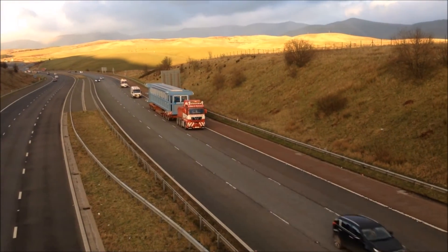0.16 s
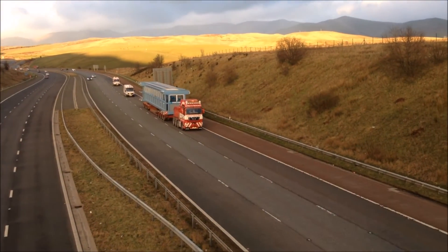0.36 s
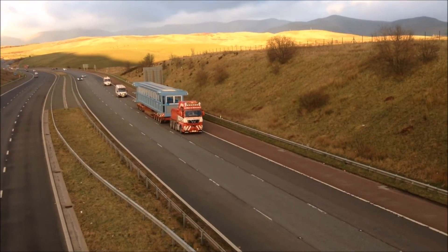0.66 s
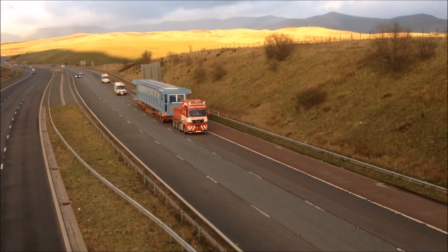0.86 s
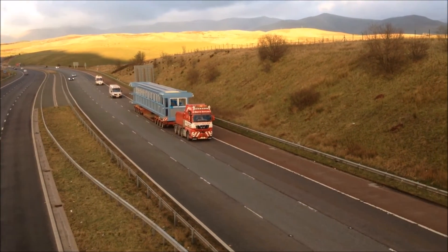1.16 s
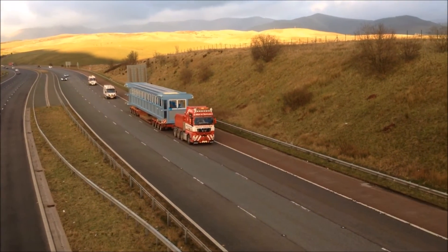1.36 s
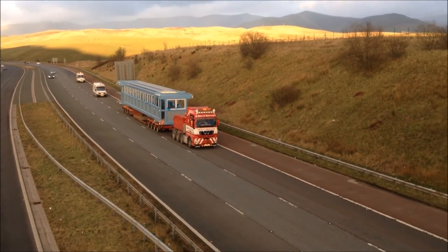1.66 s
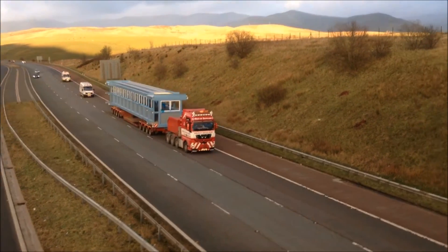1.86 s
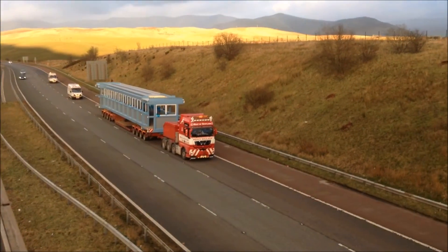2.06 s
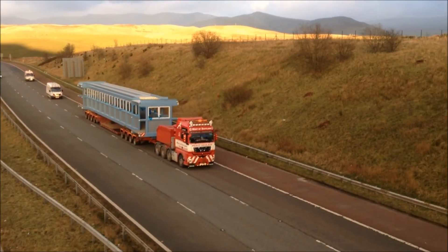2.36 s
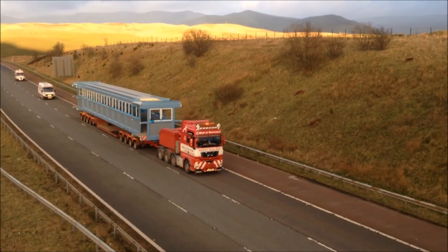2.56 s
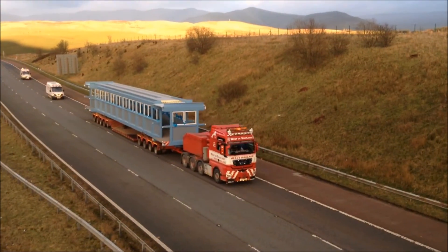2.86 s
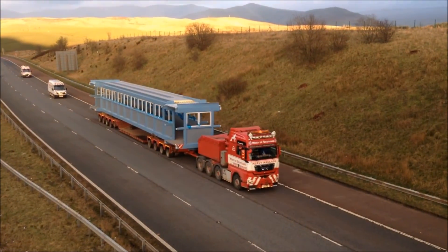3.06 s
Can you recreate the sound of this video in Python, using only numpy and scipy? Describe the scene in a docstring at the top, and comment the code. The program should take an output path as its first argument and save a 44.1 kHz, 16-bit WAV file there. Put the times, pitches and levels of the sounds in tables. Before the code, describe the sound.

Heard from a bridge, car tyre roar fades, then an approaching heavy truck sounds a brassy horn once with a short echo. Tiny close clicks and a squeak follow, then low bumps and swelling truck rumble, in mono.

```python
"""A motorway heard from a bridge: a car's tyre roar fades as it passes below, a heavy truck draws near
and sounds its twin air horns. Close by, a small mechanism clicks and squeaks; a few low thumps.
Horns are summed overtones plus air noise and an answering tail; roar and hiss are shaped noise; drone,
squeak and thumps are smeared tones; clicks are short decaying sines."""
import sys
import numpy as np
from scipy import signal
from scipy.fft import rfft, irfft, next_fast_len
from scipy.io import wavfile
from scipy.ndimage import uniform_filter1d, map_coordinates

SR = 44100
rng = np.random.default_rng(int(sys.argv[2]) if len(sys.argv) > 2 else 0)


def dump_mix(stems):
    """Bounce the given channels to the path in sys.argv[1] as a 16-bit WAV at rate SR."""
    frames = np.atleast_2d(stems).T  # one column per channel
    limited = np.clip(frames, -1, 1)  # hard clip at full scale
    pcm = np.round(limited * 32767).astype(np.int16)
    wavfile.write(sys.argv[1], SR, pcm)


def gain_from_decibels(decibels):
    """Convert decibel values to linear amplitude factors."""
    exponent = np.asarray(decibels, float) / 20
    return 10 ** exponent


N = 142002
T = np.arange(N) / SR

# horn blast envelope, relative: time_s, level_db
HORN_LEVEL = [(1.352, -46), (1.362, -30.5), (1.39, -17), (1.63, -19), (1.70, -17), (1.80, -14.5),
              (1.83, -24), (1.87, -31), (1.895, -49)]
# overtones of the high and low trumpet, relative: multiple, level_db
HIGH_OVERTONES = [(1, -20), (3, -10), (4, -8), (5, -3), (6, -1), (7, -10), (8, -16), (9, -27), (10, -19),
                  (11, -14), (12, -20), (13, -27), (16, -40)]
LOW_OVERTONES = [(3, -7), (4, -1), (5, 0), (6, -5), (7, -14), (8, -5), (9, -9), (10, -15)]
# spectrum of air rushing in the horns, relative: freq_hz, density_db_per_hz
HORN_AIR_SPECTRUM = [(400, -60), (600, 1), (1100, -1), (2300, -7.5), (2900, -19.5), (4000, -54)]
# truck tyre roar: time_s, level_db
TRUCK_LEVEL = [(0, -28.5), (1.0, -29), (1.35, -30), (1.9, -25), (2.15, -27.5), (2.5, -25), (2.85, -23.5),
               (3.22, -21.5)]
# its spectrum, relative: freq_hz, density_db_per_hz
TRUCK_SPECTRUM = [(15, -81), (25, -54), (54, -42), (161, -10.5), (205, -5.5), (338, -18.5), (374, -22.5),
                  (536, -11), (695, -13), (800, -16), (902, -16.5), (1640, -24), (3000, -37), (3900, -56),
                  (6600, -120)]
# truck treble hiss: time_s, level_db
HISS_LEVEL = [(0, -37), (1.2, -54.5), (1.35, -52), (1.45, -44.5), (1.85, -42), (2.1, -44), (2.7, -40.5),
              (3.22, -35)]
# its spectrum, relative: freq_hz, density_db_per_hz
HISS_SPECTRUM = [(1650, -11), (2800, -2.5), (4130, -3), (4430, 0.5), (4650, -6), (5030, -17), (5630, -11),
                 (7510, -15.5), (10400, -27), (11200, -27), (15100, -43.5)]
# truck drone: time_s, pitch_hz, level_db
DRONE_TRACK = [(0, 196, -38), (1.0, 194, -37.5), (2.0, 195, -35), (2.4, 196, -27), (2.6, 212, -31.5),
               (3.22, 220, -29)]
# car tyre roar: time_s, level_db
CAR_LEVEL = [(0, -16), (.4, -17), (.64, -16.5), (.7, -19.5), (.9, -22), (1.0, -28), (1.3, -29.5),
             (2.0, -33), (3.22, -84)]
# its spectrum before the road echo, relative: freq_hz, density_db_per_hz
CAR_SPECTRUM = [(24, -75), (40, -48), (103, -14), (153, -22), (191, -16.5), (240, -14), (467, -18.5),
                (600, -5.5), (960, -4), (1790, -14.5), (2600, -29.5), (3300, -37), (4590, -27.5),
                (4940, -36), (9420, -47.5), (15100, -67)]
# mechanism clicks: start_s, level_db, pitch_hz
CLICK_EVENTS = [(1.825, -36, 8900), (1.8612, -31, 5670), (1.866, -32.5, 10200), (1.8698, -24, 6950),
                (1.8744, -19.5, 4170), (1.880, -36, 9100), (2.141, -49, 6500), (2.288, -39, 6000)]
# whistling bands of the squeak, one falling, one rising: time_s, pitch_hz, level_db
FALLING_SQUEAK = [(2.148, 7020, -44), (2.152, 5050, -38), (2.158, 4360, -28), (2.165, 3350, -36),
                  (2.18, 4250, -38), (2.19, 4100, -49)]
RISING_SQUEAK = [(2.153, 5150, -48), (2.164, 5700, -46), (2.181, 5740, -34.5), (2.192, 6090, -33),
                 (2.199, 6400, -47), (2.22, 6460, -58)]
# low bumps: centre_s, pitch_hz, level_db
THUMP_EVENTS = [(2.27, 155, -25), (2.32, 125, -30), (2.9, 150, -29), (3.02, 330, -20), (3.045, 130, -28),
                (3.2, 230, -17)]


def unit(x):
    """Scale to rms 1."""
    return x / np.sqrt(np.mean(np.abs(x) ** 2) + 1e-20)


def curves(rows):
    """One value per sample for each column after the time."""
    time_s, *columns = np.transpose(rows)
    return [np.interp(T, time_s, column) for column in columns]


def wobble(knots_per_s):
    """Smooth random curve through normally distributed knots."""
    knots = rng.standard_normal(int(N * knots_per_s / SR) + 4)
    return map_coordinates(knots, [T * knots_per_s])


def rush(spectrum, patchy_db):
    """Coloured noise of rms 1 with time-frequency patches of random gain."""
    grains = signal.stft(rng.standard_normal(N + 512), nperseg=512)[2]
    patches = uniform_filter1d(rng.standard_normal(grains.shape), size=6, axis=0)
    patches = uniform_filter1d(patches, size=12, axis=1)
    noise = signal.istft(grains * gain_from_decibels(patchy_db * unit(patches)), nperseg=512)[1][:N]
    size = next_fast_len(N + 8192)
    freq_hz, density_db = np.transpose(spectrum)
    bins_hz = np.fft.rfftfreq(size, 1 / SR)
    gain_db = np.interp(np.log(bins_hz + 1), np.log(freq_hz + 1), density_db)
    return unit(irfft(rfft(noise, size) * gain_from_decibels(gain_db), size)[:N])


def fuzzy_line(pitch_hz, width_hz, rough):
    """Tone of rms 1; the share rough is smeared into a narrow band of noise."""
    smear = wobble(width_hz) + 1j * wobble(width_hz)
    carrier = np.exp(2j * np.pi * np.cumsum(pitch_hz) / SR)
    return unit(np.real(((1 - rough) + rough * smear) * carrier))


def trumpet(pitch_hz, overtones):
    """Harmonics on one drifting pitch, each wavering in level."""
    waver_db, drift_share = 2.3, .001
    drifting_hz = pitch_hz * (1 + drift_share * wobble(23.64))
    phase = 2 * np.pi * np.cumsum(drifting_hz) / SR
    return sum(gain_from_decibels(db + waver_db * wobble(18)) * np.sin(k * phase - .7 * k) for k, db in overtones)


def horns():
    """Two air trumpets; pitch sags as the air runs out, the cutting answers with a decaying noise tail."""
    high_hz, low_hz = 188.15, 157.7
    horn_db, low_db, air_db = 1.5, -12.5, -13
    sag_start_s, sag_share_per_s = 1.815, .26
    valley_db, valley_t60_s = -12, .2
    sag = 1 - sag_share_per_s * np.clip(T - sag_start_s, 0, .2)
    blast = trumpet(high_hz * sag, HIGH_OVERTONES)
    blast = blast + gain_from_decibels(low_db) * trumpet(low_hz * sag, LOW_OVERTONES)
    blast = blast + gain_from_decibels(air_db) * rush(HORN_AIR_SPECTRUM, patchy_db=3.5)
    gate = (T > HORN_LEVEL[0][0]) & (T < HORN_LEVEL[-1][0])
    direct = gate * gain_from_decibels(curves(HORN_LEVEL)[0] + horn_db) * blast
    tail = rng.standard_normal(SR // 2) * gain_from_decibels(-60 * T[:SR // 2] / valley_t60_s)
    answer = signal.fftconvolve(direct, tail / np.linalg.norm(tail))[:N]
    return direct + gain_from_decibels(valley_db) * answer


def truck():
    """Broad roar of many tyres, a treble hiss and a low wavering drone."""
    pitch_hz, drone_db = curves(DRONE_TRACK)
    roar_db = curves(TRUCK_LEVEL)[0] + .72 * wobble(9.1)
    hiss_db = curves(HISS_LEVEL)[0] + .8 * wobble(12)
    roar = gain_from_decibels(roar_db) * rush(TRUCK_SPECTRUM, patchy_db=1)
    hiss = gain_from_decibels(hiss_db) * rush(HISS_SPECTRUM, patchy_db=.7)
    drone = gain_from_decibels(drone_db) * fuzzy_line(pitch_hz, width_hz=18, rough=.62)
    return roar + hiss + drone


def car():
    """Tyre roar, direct and off the road; the growing lag slides the notches down as it moves."""
    echo_share, lag_ms, lag_growth_ms_per_s = -.5, .228, .12  # echo inverted
    flutter_db = .8
    roar = rush(CAR_SPECTRUM, patchy_db=1.5)
    lag_s = (lag_ms + lag_growth_ms_per_s * T) / 1000
    echo = map_coordinates(roar, [np.arange(N) - lag_s * SR], mode="nearest")
    level_db = curves(CAR_LEVEL)[0] + flutter_db * wobble(7.9)
    return gain_from_decibels(level_db) * unit(roar + echo_share * echo)


def clicks():
    """Decaying sines roughened by noise: a fast decay over a weak slower rattle, cut at 400 samples."""
    click_t60_s, rattle_t60_s, rattle_db = .0056, .03, -20
    out, t = np.zeros(N), T[:400]
    for start_s, level_db, pitch_hz in CLICK_EVENTS:
        decay = gain_from_decibels(level_db - 60 * t / click_t60_s)
        decay = decay + gain_from_decibels(level_db + rattle_db - 60 * t / rattle_t60_s)
        grit = .8 + 1.1 * uniform_filter1d(rng.standard_normal(400), size=4)
        start = round(start_s * SR)
        out[start:start + 400] += decay * np.sin(2 * np.pi * pitch_hz * t) * grit
    return out


def squeak():
    """Two gliding whistles, each with a wider scrape around it and a faint octave."""
    whistle_width_hz, scrape_width_hz = 900, 4500
    scrape_db, octave_db = -5, -27
    out = np.zeros(N)
    for rows in (FALLING_SQUEAK, RISING_SQUEAK):
        pitch_hz, level_db = curves(rows)
        band = fuzzy_line(pitch_hz, whistle_width_hz, rough=.69)
        band += gain_from_decibels(scrape_db) * fuzzy_line(pitch_hz, scrape_width_hz, rough=.88)
        band += gain_from_decibels(octave_db) * fuzzy_line(2 * pitch_hz, scrape_width_hz, rough=1)
        gate = (T > rows[0][0]) & (T < rows[-1][0])
        out += gate * gain_from_decibels(level_db) * band
    return out


def mechanism():
    """Tiny dry clicks and a short scraping squeak."""
    return clicks() + squeak()


def thumps():
    """Soft low bumps: puffs of narrow-band rumble under a bell-shaped envelope."""
    half_length_s, width_share = .024, .5  # half length to 1/e; band width over pitch
    out = np.zeros(N)
    for centre_s, pitch_hz, level_db in THUMP_EVENTS:
        envelope = np.exp(-((T - centre_s) / half_length_s) ** 2)
        rumble = fuzzy_line(np.full(N, pitch_hz), width_share * pitch_hz, rough=1)
        out += gain_from_decibels(level_db) * envelope * rumble
    return out


def scene():
    """All sources, one channel."""
    return (horns() + truck() + car() + mechanism() + thumps())[None]


def band_limit(x):
    """A steep low-pass at the top of the band."""
    return signal.sosfilt(signal.butter(12, 15250, fs=SR, output="sos"), x)


def record(dry):
    """The finished mix as delivered."""
    return band_limit(dry)


dry = scene()
out = record(dry)
dump_mix(out)
```